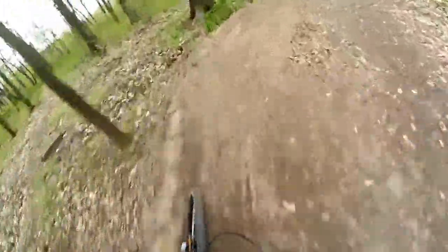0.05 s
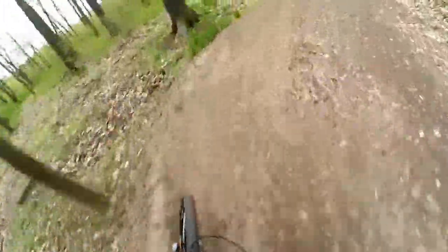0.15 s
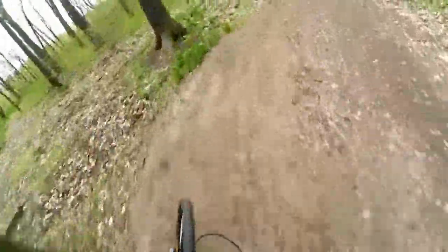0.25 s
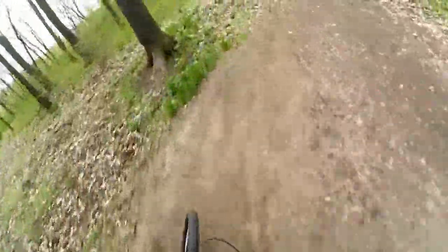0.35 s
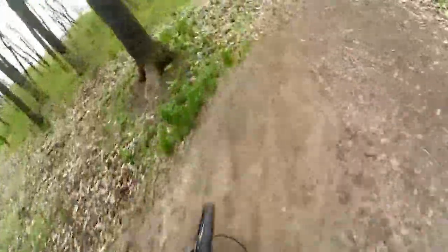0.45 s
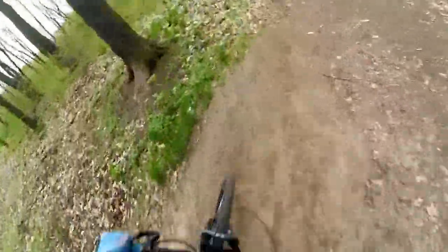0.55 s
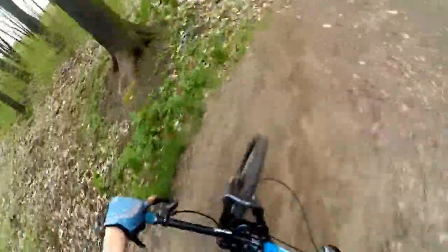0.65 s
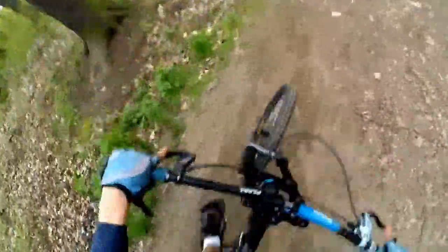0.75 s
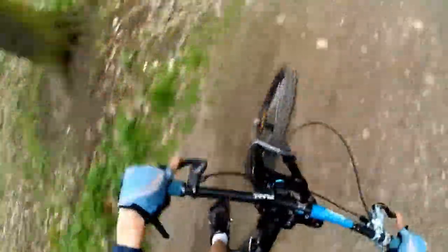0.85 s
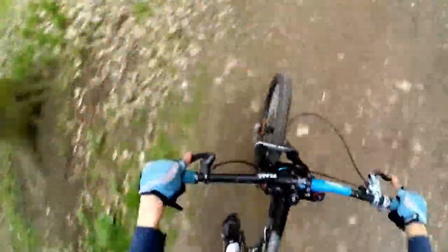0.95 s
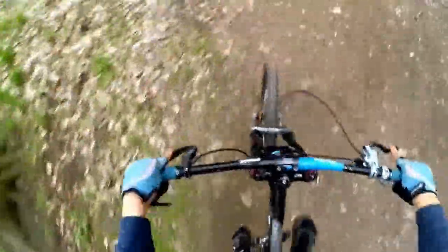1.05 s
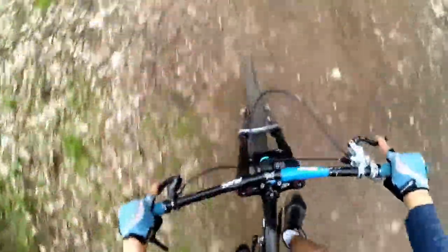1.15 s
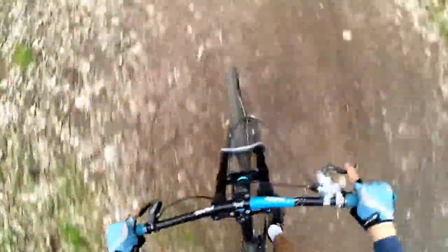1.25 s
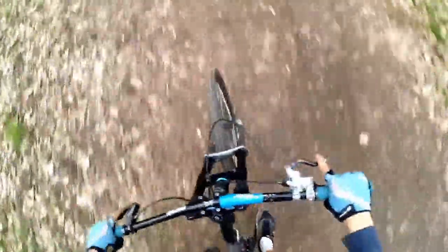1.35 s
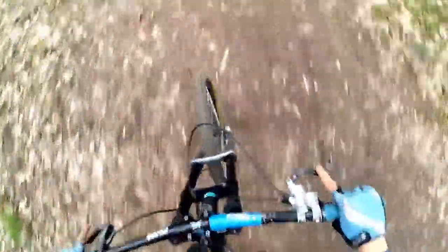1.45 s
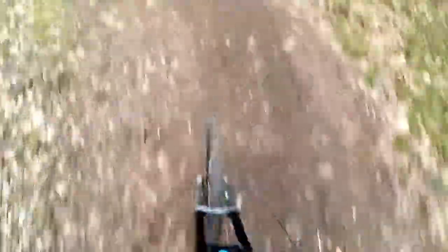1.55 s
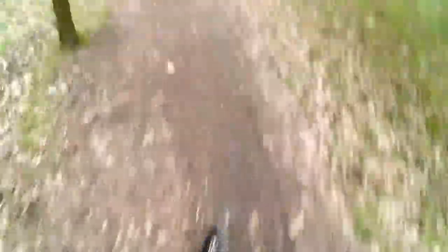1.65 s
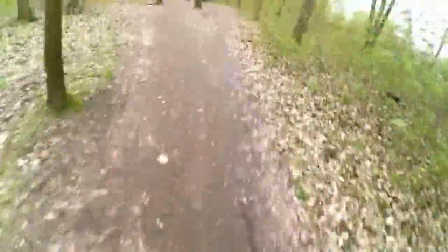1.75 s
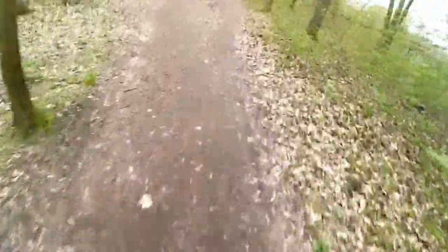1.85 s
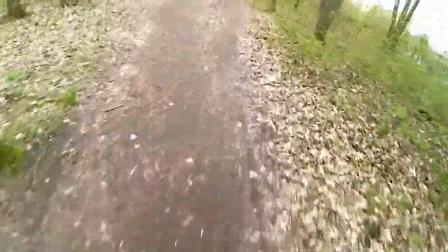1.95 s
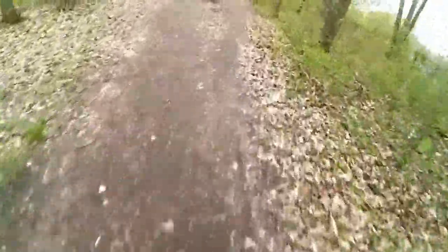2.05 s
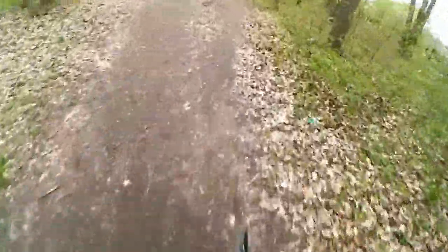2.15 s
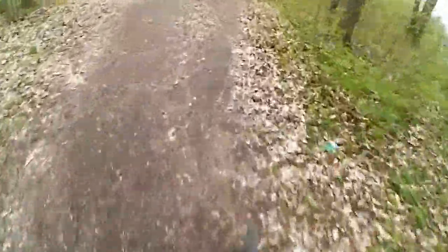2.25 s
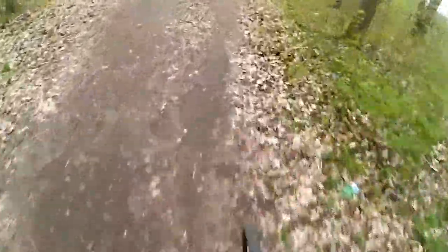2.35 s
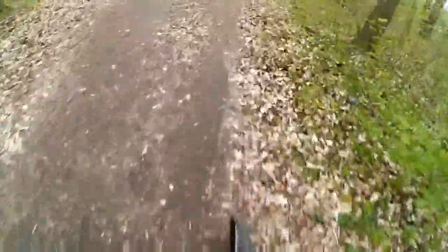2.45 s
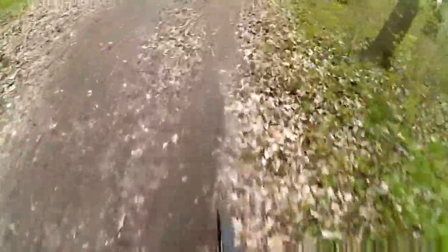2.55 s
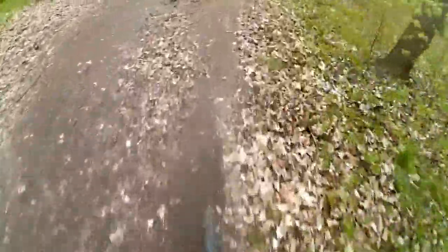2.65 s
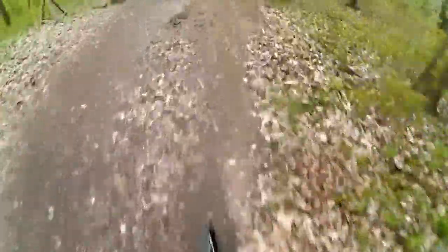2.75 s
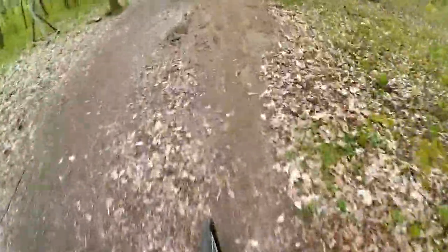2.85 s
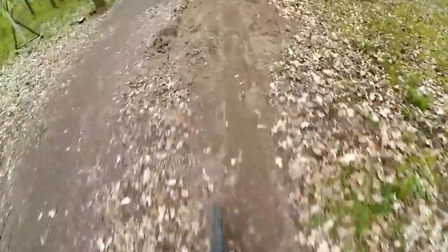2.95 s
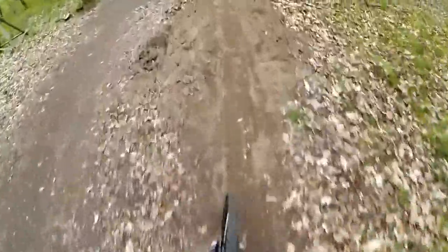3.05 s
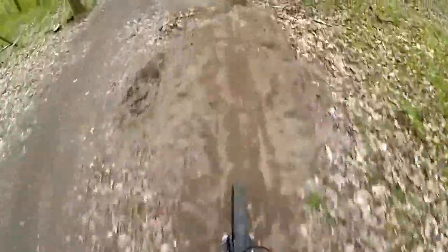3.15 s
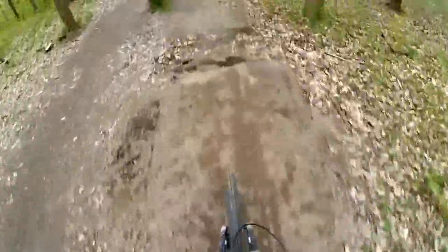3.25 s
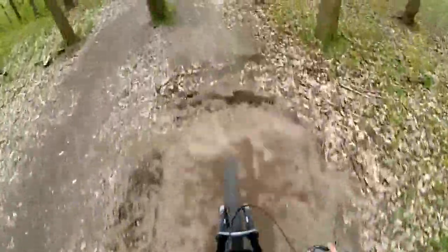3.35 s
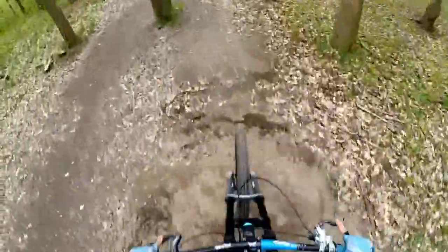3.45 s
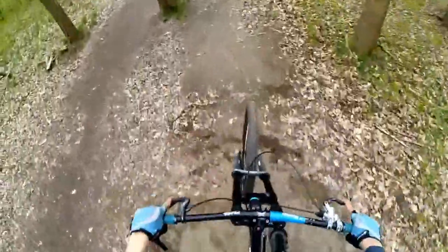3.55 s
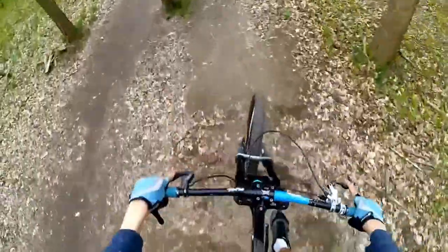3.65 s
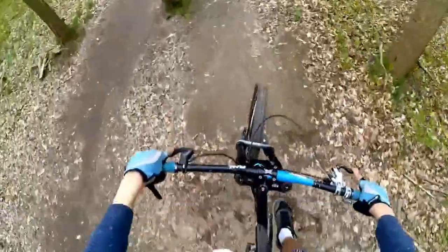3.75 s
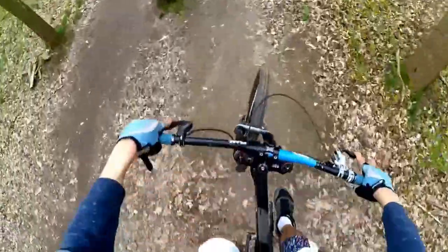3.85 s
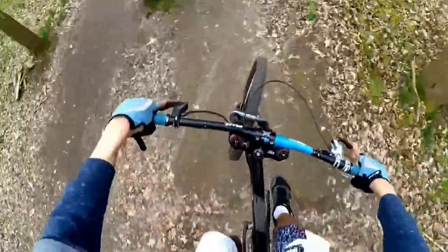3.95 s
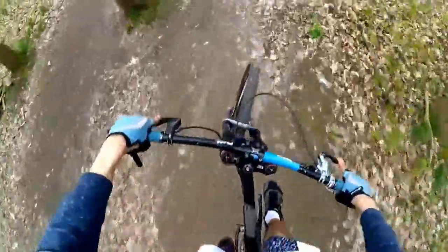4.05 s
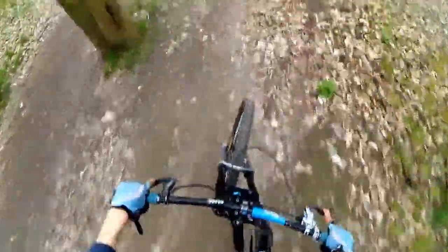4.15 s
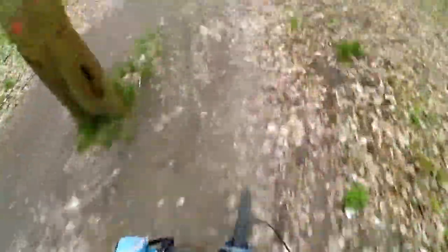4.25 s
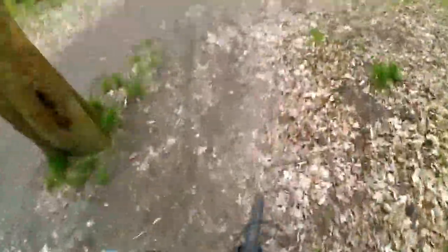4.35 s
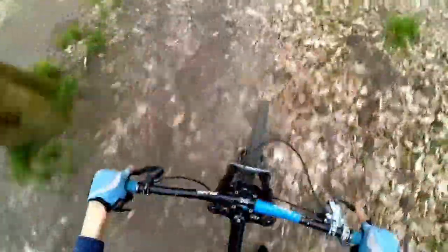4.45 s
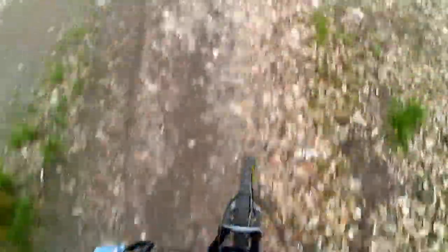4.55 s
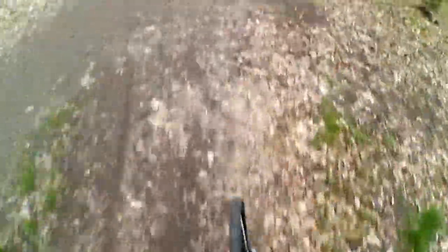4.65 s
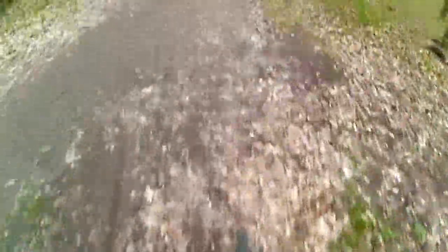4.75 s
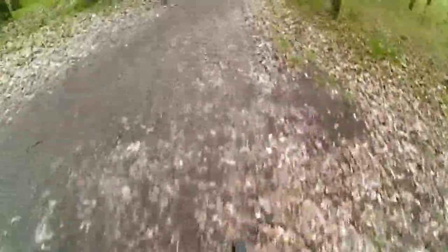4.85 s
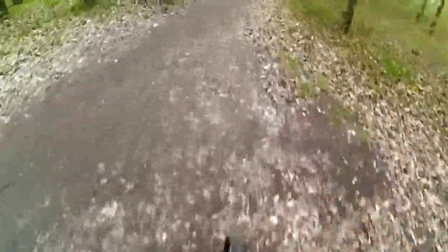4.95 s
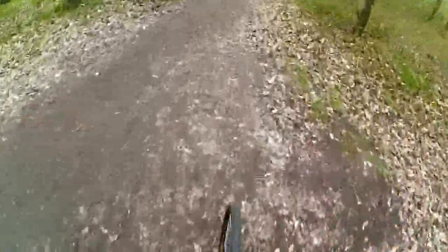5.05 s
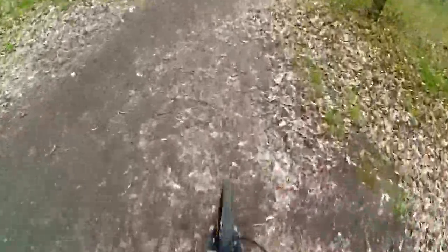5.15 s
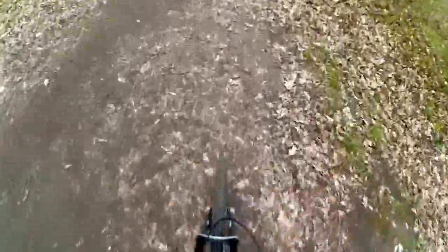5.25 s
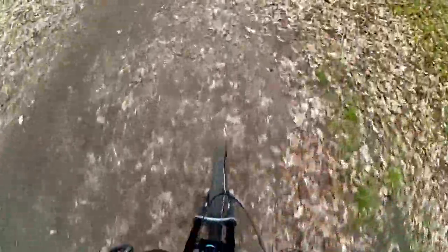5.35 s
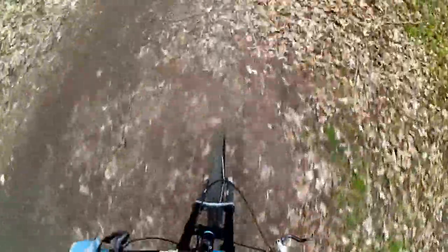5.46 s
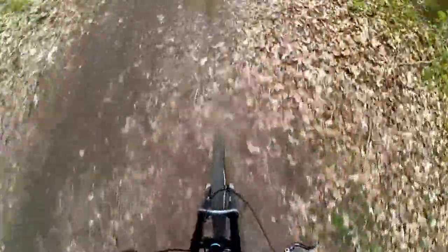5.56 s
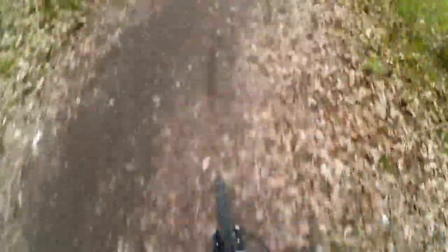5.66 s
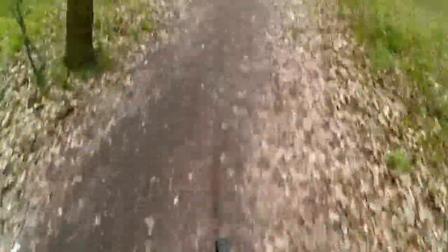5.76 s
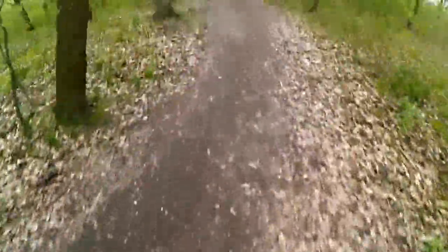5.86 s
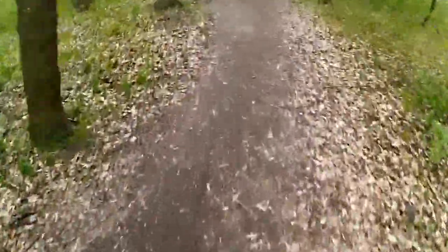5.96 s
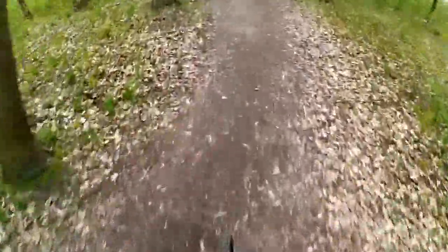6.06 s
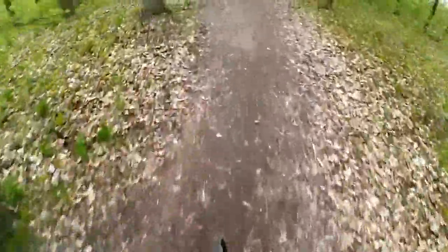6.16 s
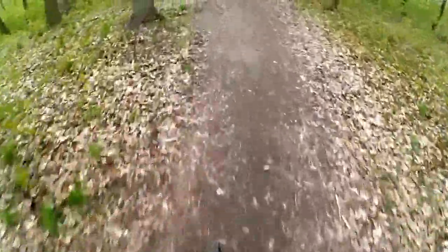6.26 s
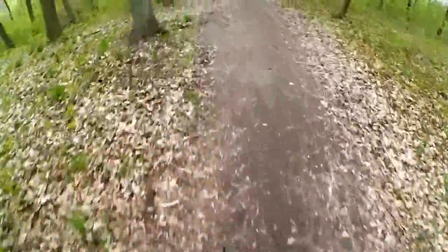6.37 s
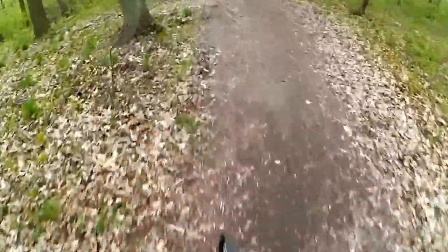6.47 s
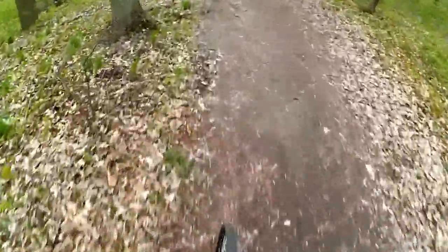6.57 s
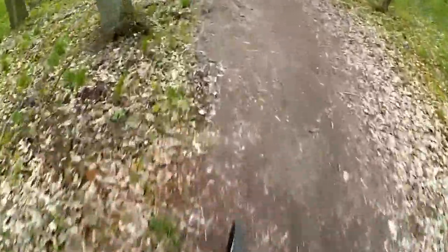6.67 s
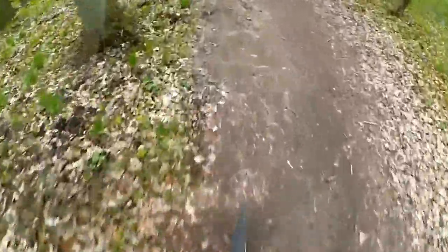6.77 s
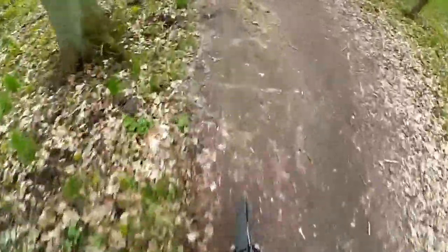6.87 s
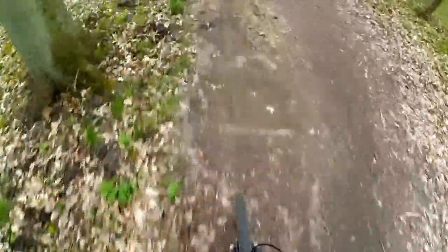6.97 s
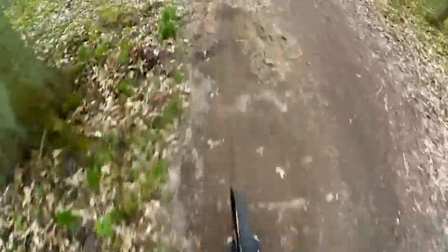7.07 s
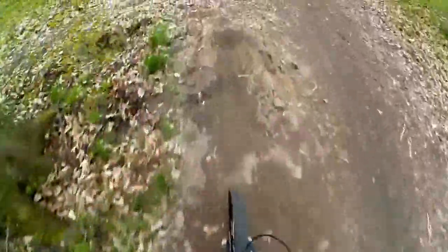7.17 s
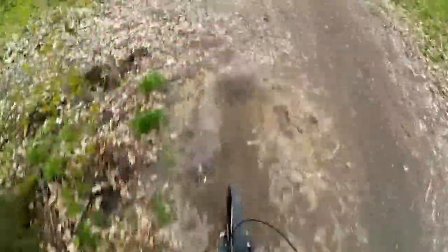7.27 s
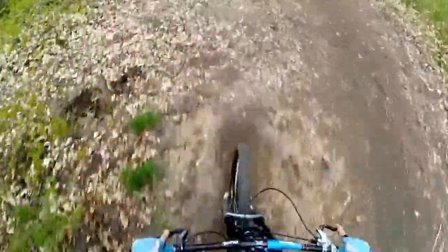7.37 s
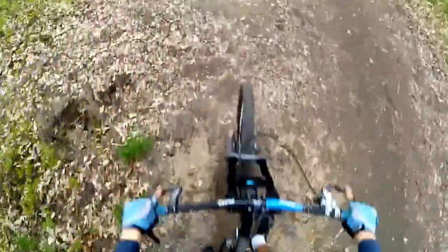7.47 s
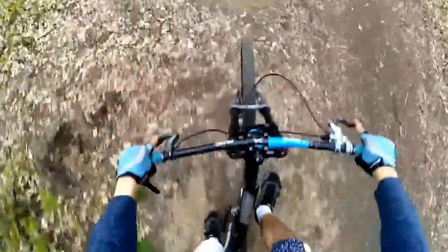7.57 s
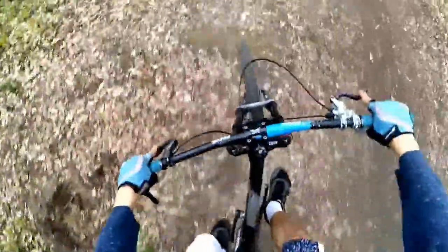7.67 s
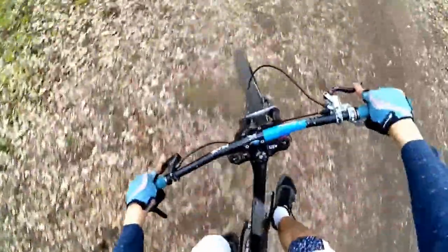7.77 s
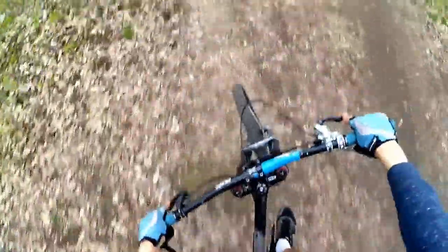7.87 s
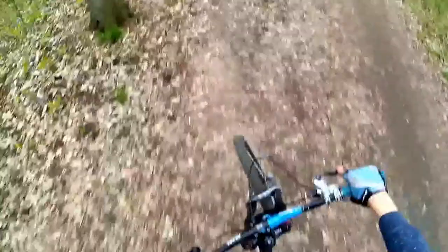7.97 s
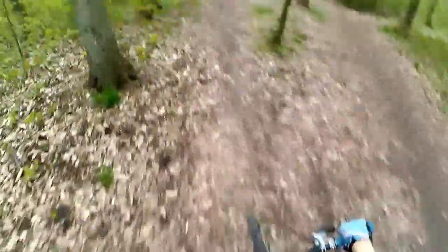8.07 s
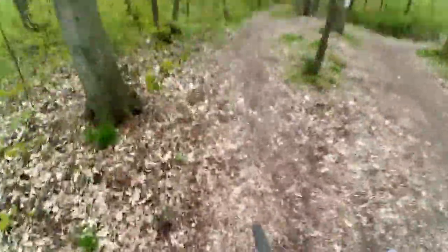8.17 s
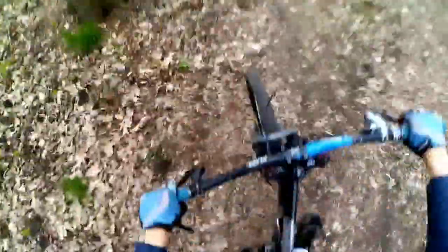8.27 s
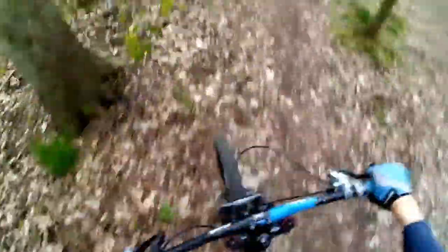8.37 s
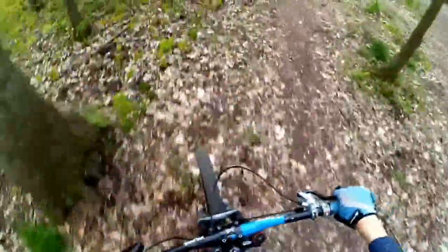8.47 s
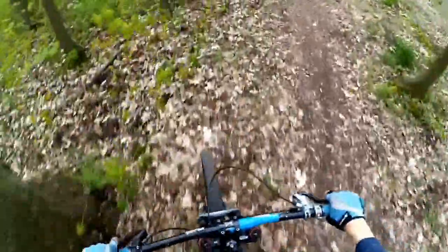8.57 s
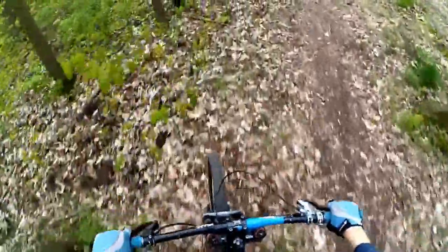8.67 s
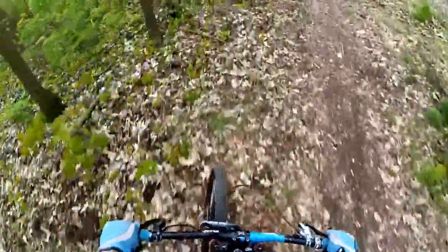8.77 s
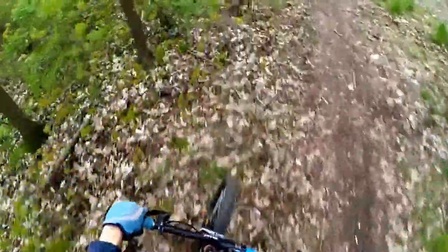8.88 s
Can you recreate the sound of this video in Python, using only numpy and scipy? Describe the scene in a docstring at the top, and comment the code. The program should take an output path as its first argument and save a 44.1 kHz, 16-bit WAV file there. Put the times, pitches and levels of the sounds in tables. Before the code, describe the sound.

A bike rolls fast down a woodland dirt path, heard close from the rider's chest. A dull tread hum, gritty rolling and leaf crackle continue beneath small metallic rattles. Early bumps bring low thuds and scraping; two brief airborne lulls each end in a heavy jolt, the second distorting the microphone. Faint hiss and low air lie underneath, mostly centred.

```python
"""Mountain-bike tyres hum and crunch down a dirt trail of dry leaves, falling quiet through two small jumps.
Place: the rider's chest, with a stereo camera microphone in a harness just above the bike.
Tread, dirt and leaves are shaped noise and grains; the knobs drone; cables and chain are struck resonances.
Jolts heave the camera with low swings and thuds, and its case scrapes in stick-slip grains.
The second landing overloads the microphone; a faint hiss and a little air lie underneath."""
import sys
import numpy as np
from scipy import signal
from scipy.fft import rfft, irfft, next_fast_len
from scipy.io import wavfile
from scipy.ndimage import uniform_filter1d, map_coordinates

SR = 44100
rng = np.random.default_rng(int(sys.argv[2]) if len(sys.argv) > 2 else 0)


def int16_out(signal):
    """Quantize to a 16-bit WAV file."""
    q = np.round(np.clip(np.atleast_2d(signal).T, -1, 1) * 32767)
    wavfile.write(sys.argv[1], SR, q.astype(np.int16))


N = 393372


def amp(db):
    """Amplitude of a level in dB."""
    return 10 ** (np.asarray(db) / 20)


def unit(x):
    """x at rms 1."""
    return x / np.sqrt(np.mean(x ** 2) + 1e-20)


def noise():
    """White noise as long as the scene."""
    return rng.standard_normal(N)


def curves(rows):
    """One value per sample for each column after the time."""
    times, *columns = np.transpose(rows)
    return [np.interp(np.arange(N) / SR, times, column) for column in columns]


def plateau(start, end, attack, release):
    """Rises to 1 over attack before start, holds until end, falls over release."""
    return np.interp(np.arange(N) / SR, [start - attack, start, end, end + release], [0, 1, 1, 0])


def wobble(rate, size=N):
    """A smooth random curve, rate knots a second."""
    knots = rng.standard_normal(int(size * rate / SR) + 4)
    return map_coordinates(knots, [np.arange(size) * rate / SR])


def filtered(x, response):
    """x times a complex response of frequency."""
    size = x.shape[-1]
    padded = next_fast_len(size + 4096)
    spectrum = rfft(x, padded) * response(np.fft.rfftfreq(padded, 1 / SR))
    return irfft(spectrum, padded)[..., :size]


def coloured(x, spectrum):
    """x shaped by (f/Hz, level/dB) points, with nothing above the last, at rms 1."""
    f, db = np.transpose(spectrum)
    return unit(filtered(x, lambda hz: amp(np.interp(np.log(hz + 1), np.log(f), db, right=-np.inf))))


def ring(x, modes):
    """x played through a body's resonances, alternating in sign."""
    def response(f):
        total = 0
        for k, (centre, width, db) in enumerate(modes):
            damping = 1j * f * width
            total = total + (-1) ** k * amp(db) * damping / (centre ** 2 - f ** 2 + damping)
        return total
    return filtered(x, response)


def struck(modes, spread_db):
    """The same resonances touched at a new spot: each is a little louder or softer."""
    return [(hz, width, db + spread_db * rng.standard_normal()) for hz, width, db in modes]


def three_bands(x, low_hz, high_hz):
    """The low, middle and high parts of x."""
    cuts = [(low_hz, "lowpass"), ([low_hz, high_hz], "bandpass"), (high_hz, "highpass")]
    filters = [signal.butter(3, hz, kind, fs=SR, output="sos") for hz, kind in cuts]
    return [signal.sosfiltfilt(sos, x, padlen=0) for sos in filters]


def grains(rate, spread_db, size=N):
    """Random tiny impacts of uneven strength, rate a second on average, at rms 1."""
    chance, strength = rng.random(size), rng.standard_normal(size)
    sign = rng.choice([-1, 1], size)
    return unit((chance < rate / SR) * sign * amp(spread_db * np.minimum(strength, 2.5)))


def add(track, s, sound):
    """Mix a sound into the track at time s."""
    start = max(round(s * SR), 0)
    track[start:start + len(sound)] += sound[:max(N - start, 0)]


# the faint hiss, a spectrum: f/Hz, level/dB per Hz (relative)
HISS_SPECTRUM = [(300, 1), (3000, -1.5), (9000, 1), (12000, 0), (14500, -1), (15500, -3)]


def hiss():
    """A steady, faint broadband hiss."""
    return amp(-76.5) * coloured(noise(), HISS_SPECTRUM)


# airflow over the microphone, a spectrum: f/Hz, level/dB per Hz (relative)
AIR_SPECTRUM = [(10, 0), (25, -8), (55, -23), (200, -29), (500, -44), (2000, -65)]


def air():
    """Air stirs left and right on their own: two unrelated low noises."""
    return amp(-59.0) * coloured(rng.standard_normal((2, N)), AIR_SPECTRUM)


# rough stretches of trail: start t/s, crest t/s, end t/s, rumble rise level/dB, sway rise level/dB
ROUGH_STRETCHES = [(0.49, 0.77, 1.27, 20, 12.5), (1.0, 1.4, 1.84, 4, 10), (1.65, 1.787, 2.1, 11.5, 8.5),
                   (2.15, 2.277, 2.58, 15, 10), (3.092, 3.406, 3.88, 21.5, 16), (4.161, 4.38, 4.87, 31, 22),
                   (5.144, 5.333, 5.5, 7.5, -0.5), (5.618, 5.935, 6.23, 13.5, 8),
                   (7.157, 7.457, 7.68, 26, 22), (8.06, 8.282, 8.73, 28.5, 21)]
ROUNDNESS = 0.56  # 0 = pointed crests, 1 = domed


def roughness():
    """How many dB the rough stretches, building to a crest and dying away, add to rumble and sway."""
    peaks = np.array([plateau(crest, crest, crest - start, end - crest)
                      for start, crest, end, _, _ in ROUGH_STRETCHES])
    domed = peaks * (1 + ROUNDNESS * (1 - peaks))
    return np.array(ROUGH_STRETCHES)[:, 3:].T @ domed


def rocking(spectrum, size):
    """Low noise with its own swells partly evened out over size samples."""
    x = coloured(noise(), spectrum)
    power = np.abs(signal.hilbert(x)) ** 2
    swell = np.sqrt(np.abs(uniform_filter1d(power, size=size)))
    return unit(x / (swell + 0.15))


# the swaying and the rumbling camera, two spectra: f/Hz, level/dB per Hz (relative)
SWAY_SPECTRUM = [(5, -4), (11, 0), (20, -3.5), (32, -10), (46, -20), (64, -35), (100, -60)]
RUMBLE_SPECTRUM = [(38, -9.5), (56, -3.5), (80, 0.5), (102, -9), (145, -20), (190, -22), (300, -37.5),
                   (600, -61)]
CALM_SWAY_DB, CALM_RUMBLE_DB = -37.5, -61  # the camera on smooth ground
# the second landing bottoms out and jars the camera: crest and half length in s, level of the added sway
OVERLOAD_S, OVERLOAD_HALF_S, OVERLOAD_DB = 8.405, 0.049, -7.5


def shaking():
    """The camera sways and rumbles on the chest as the trail roughens; the second landing jars it."""
    rumble_db, sway_db = roughness()
    t = np.arange(N) / SR
    jar = amp(OVERLOAD_DB) * np.exp(-((t - OVERLOAD_S) / OVERLOAD_HALF_S) ** 2)
    sway = amp(CALM_SWAY_DB + sway_db + 1.15 * wobble(5.4)) + jar
    rumble = amp(CALM_RUMBLE_DB + rumble_db + 3.2 * wobble(11)) + amp(-9) * jar
    return sway * rocking(SWAY_SPECTRUM, size=4000) + rumble * rocking(RUMBLE_SPECTRUM, size=1800)


# the hardest bumps heave the rider's chest:
# middle t/s, swing f/Hz, heave level/dB, half length t/s, thud level/dB
CHEST_HEAVES = [(0.755, 50.7, -18.5, 0.022, -44), (0.928, 28.4, -13.5, 0.031, -48.5),
                (1.784, 48, -26.5, 0.017, -51), (3.202, 65, -21, 0.014, -45.5),
                (3.348, 30, -15, 0.015, -49.5), (3.49, 54, -24, 0.018, -54), (4.36, 45.4, -5, 0.029, -36.5),
                (4.473, 50, -17, 0.016, -30.5), (4.523, 30, -11.5, 0.015, -35),
                (7.451, 50.4, -19, 0.015, -42), (7.581, 52.5, -23.5, 0.059, -52),
                (8.207, 43, -10, 0.037, -39.5), (8.315, 24.9, -24, 0.03, -27.5),
                (8.41, 31, 2.5, 0.017, -22)]
# the thud of a bump, a spectrum: f/Hz, level/dB per Hz (relative)
THUD_SPECTRUM = [(70, -8), (110, -5), (145, 7), (180, -2), (260, 1.5), (340, -11.5), (450, -9.5),
                 (650, -25), (1000, -48)]


def heaves():
    """Each hard bump swings the camera in a short low sine and thuds with a burst of dull noise."""
    swings, thud_level = np.zeros(N), np.zeros(N)
    t = np.arange(-SR // 8, SR // 8) / SR
    for s, hz, db, half_length, thud_db in CHEST_HEAVES:
        push = np.exp(-(t / half_length) ** 2)
        add(swings, s + t[0], amp(db) * push * np.sin(2 * np.pi * hz * t))
        add(thud_level, s + t[0], amp(thud_db) * push)
    return swings + thud_level * coloured(noise(), THUD_SPECTRUM)


# the case scrapes in its harness, right at the microphone:
# start t/s, swell t/s, fade t/s, body level/dB (rms over the stroke), rasp level/dB re body
CASE_SCRAPES = [(0.713, 0.0082, 0.04, -36.5, -6), (0.814, 0.055, 0.027, -45, -9),
                (0.972, 0.025, 0.014, -51.5, -7.5), (1.498, 0.019, 0.067, -52.5, -5),
                (1.692, 0.071, 0.031, -41.5, -6), (3.183, 0.032, 0.029, -43.5, -9.5),
                (3.324, 0.013, 0.035, -40.5, -7.5), (3.476, 0.01, 0.03, -38.5, -6.5),
                (4.293, 0.034, 0.023, -33.5, -1), (4.348, 0.017, 0.027, -35.5, 3),
                (4.38, 0.021, 0.024, -40.5, -8), (4.424, 0.022, 0.049, -34, -2.5),
                (4.495, 0.013, 0.025, -32.5, -4), (4.55, 0.041, 0.035, -34, -4.5),
                (4.682, 0.015, 0.021, -55, -6), (5.891, 0.016, 0.024, -40.5, -9.5),
                (7.386, 0.017, 0.07, -51, -6), (7.5, 0.02, 0.04, -37.5, -2.5),
                (8.176, 0.013, 0.013, -30.5, -4.5), (8.197, 0.017, 0.042, -41.5, -2.5),
                (8.258, 0.023, 0.061, -35, -5.5), (8.307, 0.02, 0.026, -17.5, -0.5),
                (8.372, 0.033, 0.026, -34.5, 5.5), (8.418, 0.027, 0.016, -42.5, -9)]
# resonances of the camera case: f/Hz, width f/Hz, level/dB
CASE_MODES = [(252, 56, -20), (714, 86, -7.5), (794, 89, -8.5), (1005, 106, 1), (1123, 129, 1),
              (1266, 160, 0), (1435, 180, -8.5), (1840, 61, -8.5), (1986, 446, -4), (2470, 408, -0.5),
              (2866, 273, -3), (3194, 112, -6), (3900, 430, -12.5), (4820, 490, -14), (6220, 900, -19),
              (8800, 2600, -27.5), (13100, 4000, -35.5)]
# fizz re rasp in a medium stroke; dB of fizz lost per dB a stroke is louder; body of a medium stroke
FIZZ_DB, FIZZ_DULLS, MEDIUM_SCRAPE_DB = -10.5, 0.31, -36


def scrapes():
    """The case sticks and slips against the harness: each stroke swells to a crest and stops short."""
    track = np.zeros(N)
    for start, swell, fade, db, rasp_db in CASE_SCRAPES:
        crest, end = start + swell, start + swell + fade
        fizz_db = rasp_db + FIZZ_DB - FIZZ_DULLS * (db - MEDIUM_SCRAPE_DB)
        t = start + np.arange(SR // 6) / SR
        knots = [start, start + 0.0016, crest, (crest + end) / 2, end]
        pressure = np.interp(t, knots, [0.095, 0.12, 0.86, 0.59, 0])
        slips = pressure * grains(rate=2100, spread_db=2.5, size=len(t))
        slips = slips * amp(1.5 * wobble(152, size=len(t)))
        body, rasp, fizz = three_bands(ring(slips, CASE_MODES), 1500, 3990)
        stroke = unit(body) + amp(rasp_db) * unit(rasp) + amp(fizz_db) * unit(fizz)
        # a longer stroke carries more energy at the same level
        add(track, start, amp(db) * stroke * np.sqrt(abs(end - start) / (t[-1] - t[0])))
    return track


# the two jumps: take-off t/s, touch-down t/s, fall of the hum level/dB,
# fall of the leaves level/dB (dirt falls half as far)
TRAIL_JUMPS = [(3.637, 4.204, 4.5, 12), (7.648, 8.1, 3.5, 8)]
UNLOAD_S, RELOAD_S = 0.19, 0.05  # fading out from take-off, and coming back just before touch-down


def aloft():
    """For each jump: 1 in the air, 0 on the ground, with ramps at both ends."""
    return np.array([plateau(off + UNLOAD_S, down - RELOAD_S, UNLOAD_S, RELOAD_S)
                     for off, down, _, _ in TRAIL_JUMPS])


def faint(db, colour_db, count):
    """Up to count small contacts at chance moments out of the jumps: (t/s, peak level/dB, colour level/dB)."""
    spread_db = 2.5
    rows = [(u * N / SR, db + spread_db * (2 * v - 1), colour_db + spread_db * (2 * w - 1))
            for u, v, w in rng.random((count, 3))]
    return [row for row in rows if not any(off < row[0] < down for off, down, _, _ in TRAIL_JUMPS)]


def contacts(rows, modes, low_hz, high_hz, attack, t60, tail_db, tail_t60):
    """Each contact is a brief chatter and a weaker after-rattle; band levels set the balance of the modes."""
    track, t = np.zeros(N), np.arange(SR // 6) / SR
    for s, db, low_db, high_db in rows:
        decay = amp(-60 * t / t60) + amp(tail_db - 60 * t / tail_t60)
        force = (1 - np.exp(-t / attack)) * decay
        answer = ring(force * rng.standard_normal(len(t)), struck(modes, spread_db=3.5))
        low, middle, high = three_bands(answer, low_hz, high_hz)
        hit = amp(low_db) * unit(low) + unit(middle) + amp(high_db) * unit(high)
        peak = np.sqrt(uniform_filter1d(hit ** 2, size=128).max())
        add(track, s, amp(db) * hit / peak)
    return track


RATTLE_DB = -6.5  # lowers all ticks and slaps below their listed peaks
# the chain slaps and jingles: t/s, peak level/dB before RATTLE_DB, jingle level/dB re its middle
CHAIN_SLAPS = [(0.2576, -47, 12), (0.4038, -46.5, 1), (0.915, -43, -3), (1.105, -35.5, -15),
               (1.115, -34, -7.5), (2.505, -29, -6), (2.5237, -25.5, -15), (3.5632, -27.5, -12.5),
               (3.6532, -43.5, -7), (4.2213, -32.5, 1), (4.2825, -32.5, -4), (4.7803, -47, 2),
               (5.1023, -40.5, -11), (5.47, -44, -4), (5.6467, -29, -9.5), (5.657, -43, 2),
               (5.7195, -30.5, -4.5), (5.74, -40, -8), (5.775, -28.5, -10), (5.7868, -38, -7),
               (5.839, -45.5, -12), (7.3393, -38.5, 4), (7.4496, -42, -3), (7.694, -36.5, -13),
               (7.7303, -47, 4), (8.078, -41.5, -25), (8.092, -38.5, -6), (8.1328, -36, -5),
               (8.14, -34, -4), (8.7638, -44, -6)]
# resonances of chain and stay: f/Hz, width f/Hz, level/dB
STAY_MODES = [(1160, 1100, -2.5), (2280, 390, 3.5), (2930, 78, 2.5), (3540, 260, 1.5), (4050, 240, 2),
              (4900, 390, -7.5), (6410, 610, -4.5), (7630, 400, -8), (7940, 390, -10), (11900, 3000, -25),
              (14300, 1800, -31)]


def slaps():
    """The chain slaps the stay: bright, longer-ringing contacts, with fainter ones scattered between."""
    events = [*CHAIN_SLAPS, *faint(-47, colour_db=-11, count=12)]
    rows = [(s, db, -10.5, jingle_db) for s, db, jingle_db in events]  # bass 10.5 dB under the middle
    return amp(RATTLE_DB) * contacts(rows, STAY_MODES, 2580, 6200,
                                     attack=0.00051, t60=0.043, tail_db=-18.0, tail_t60=0.3)


# cables and levers tick on the frame: t/s, peak level/dB before RATTLE_DB, knock level/dB re its middle
FRAME_TICKS = [(0.159, -36.5, -7), (0.257, -41.5, -1), (0.5062, -39, 0), (0.626, -36.5, -1),
               (0.7675, -34, -18), (2.0157, -35, -10), (2.0722, -41, -22), (2.151, -34.5, -4),
               (2.2143, -36, -5), (2.25, -38, -2), (2.2804, -38, 5), (2.329, -34.5, -10),
               (2.7332, -38.5, -11), (2.8932, -33, -15), (2.9792, -37.5, -3), (3.0939, -38, -4),
               (3.1961, -32.5, 4), (4.1, -51, -3), (4.1591, -52, -2), (4.1938, -43.5, -4), (4.4852, -22, 1),
               (5.0527, -39, -6), (5.237, -40, 1), (5.8693, -41.5, -5), (6.0605, -39, -16),
               (6.281, -45, -16), (6.833, -42, -19), (7.2523, -38.5, -2), (7.2723, -28, -2),
               (7.6321, -41, -6), (7.976, -41.5, -2)]
# resonances of the frame: f/Hz, width f/Hz, level/dB
FRAME_MODES = [(300, 180, -12.5), (710, 93, -8), (1038, 46, -2.5), (1330, 135, -1.5), (1885, 75, -1),
               (2295, 165, 3), (2870, 170, 1.5), (3165, 155, -1.5), (3520, 550, -6), (4330, 980, -8.5),
               (6940, 2000, -23), (10500, 4600, -32)]


def ticks():
    """Cables and levers tick on the frame: dull, short contacts, with fainter ones scattered between."""
    events = [*FRAME_TICKS, *faint(-45, colour_db=-13, count=20)]
    rows = [(s, db, knock_db, -15.5) for s, db, knock_db in events]  # treble 15.5 dB under the middle
    return amp(RATTLE_DB) * contacts(rows, FRAME_MODES, 1360, 3900,
                                     attack=0.00056, t60=0.02, tail_db=-21, tail_t60=0.1)


# the knobs bite and drone louder: crest t/s, half length t/s, pitch f/Hz, level/dB
KNOB_BITES = [(1.259, 0.0797, 214, -55.5), (1.37, 0.05, 289.7, -58), (1.541, 0.062, 216, -53.5),
              (1.628, 0.05, 262, -54), (6.804, 0.24, 208, -62.5), (7.731, 0.059, 216, -57.5)]
KNOB_HZ, KNOB_DB = 207, -68  # the drone in plain rolling


def drone():
    """Knobs strike the packed dirt in quick, unsteady succession; each bite swells and pulls the pitch."""
    t = np.arange(N) / SR
    plain = amp(KNOB_DB - 6.9 * aloft().sum(0))
    bites = [amp(db) * np.exp(-((t - s) / half) ** 2) for s, half, _, db in KNOB_BITES]
    swells = [plain] + bites
    pitches = [KNOB_HZ] + [pitch for _, _, pitch, _ in KNOB_BITES]
    hz = np.dot(pitches, swells) / sum(swells)  # the louder swell has more say
    unsteady = 1 + 0.065 * wobble(55)
    phase = 2 * np.pi * np.cumsum(hz * unsteady) / SR
    return np.linalg.norm(swells, axis=0) * amp(1.8 * wobble(30)) * unit(np.sin(phase))


# rolling before, between and after the jumps:
# t/s, tread hum level/dB, leaf crunch level/dB, all before the trims below
RUN_IN_LEVELS = [(0.0, -62.5, -70), (0.5, -62, -70), (0.83, -56, -65), (1.02, -61.5, -62.5),
                 (1.6, -57, -66), (1.92, -61, -66.5), (3.4, -58, -65), (3.6, -61, -70.5)]
RUN_BETWEEN_LEVELS = [(4.68, -63.5, -63.5), (5.45, -62.5, -67.5), (5.73, -61, -62), (6.09, -59.5, -69),
                      (6.65, -59, -69), (7.17, -61.5, -67.5), (7.43, -56.5, -61), (7.66, -56.5, -68)]
RUN_OUT_LEVELS = [(8.52, -67, -58), (8.666, -72, -60.5), (8.88, -64, -57)]
# landings press the tyres into the ground: start t/s, end t/s, press level/dB (scaled for each layer)
LANDING_PRESSES = [(4.295, 4.566, 11), (8.172, 8.421, 12.5)]
PRESS_S, RELAX_S = 0.067, 0.046  # the suspension sinks, and comes back
HUM_DB, ROLL_DB, CRUNCH_DB = 2, -3, 0.8  # trims of the three layers
ROLL_GROWS = 0.15  # dB of dirt per dB of rumble


def tyre_levels():
    """Hum, dirt and leaves in dB: they fall in the air and swell on landing; rough ground throws more dirt."""
    tread_db, leaf_db = curves([*RUN_IN_LEVELS, *RUN_BETWEEN_LEVELS, *RUN_OUT_LEVELS])
    hum_fall_db, ground_fall_db = np.array(TRAIL_JUMPS)[:, 2:].T @ aloft()
    press_db = sum(db * plateau(start, end, PRESS_S, RELAX_S) for start, end, db in LANDING_PRESSES)
    hum_db = HUM_DB + tread_db - hum_fall_db + 1.1 * press_db
    roll_db = ROLL_DB + (tread_db + leaf_db) / 2 - 0.5 * ground_fall_db + 0.5 * press_db
    roll_db = roll_db + ROLL_GROWS * roughness()[0]
    crunch_db = CRUNCH_DB + leaf_db - ground_fall_db + 0.66 * press_db
    return hum_db, roll_db, crunch_db


# resonances of the chain links: f/Hz, width f/Hz, level/dB
LINK_MODES = [(6900, 220, -7), (8250, 130, 0), (9200, 260, -8), (10600, 350, -11)]


def debris(crunch_db):
    """Flung grit rings the frame and chain links clink faintly, both following the leaf crunch."""
    grit = amp(crunch_db - 4.5) * unit(ring(grains(rate=44, spread_db=6.0), FRAME_MODES))
    links = amp(crunch_db - 13) * unit(ring(grains(rate=18, spread_db=7.0), LINK_MODES))
    return grit + links


# tread hum, rolling dirt and breaking leaves, three spectra: f/Hz, level/dB per Hz (relative)
TREAD_SPECTRUM = [(70, -23.5), (100, 10), (140, -3.5), (200, 0), (270, -4), (345, -2.5), (440, -13),
                  (600, -19), (900, -19), (2000, -52)]
DIRT_SPECTRUM = [(400, -22.5), (650, -8.5), (800, -19), (980, -0.5), (1130, -1), (1350, -8.5),
                 (1600, -16.5), (1900, -7), (2100, -14.5), (2400, -2.5), (2800, -12), (4000, -35)]
LEAF_SPECTRUM = [(900, -15.5), (1600, -20), (1950, -8.5), (2150, -14.5), (2450, -5.5), (3050, -4),
                 (3500, 3.5), (3950, 3.5), (4450, -10), (4900, -4.5), (5350, -10), (6400, -3.5),
                 (7600, -12), (10000, -18.5), (15800, -19.5)]
CRACKLE_PER_S, CRACKLE_DB = 100, -7.5  # single dry leaves snap; level re the crunch


def tyres():
    """The casings hum, dirt rolls under them and dry leaves break in clumps or snap singly."""
    hum_db, roll_db, crunch_db = tyre_levels()
    hum = amp(hum_db + 1.36 * wobble(15)) * coloured(noise(), TREAD_SPECTRUM)
    roll = amp(roll_db + 0.93 * wobble(25)) * coloured(noise(), DIRT_SPECTRUM)
    breaking = grains(rate=2000, spread_db=2) * amp(1.7 * wobble(54)) + 0.5 * noise()
    crunch = amp(crunch_db) * coloured(breaking, LEAF_SPECTRUM)
    snaps = grains(rate=CRACKLE_PER_S, spread_db=1.5)
    crackle = amp(crunch_db + CRACKLE_DB) * coloured(snaps, LEAF_SPECTRUM)
    return hum + roll + crunch + crackle + debris(crunch_db)


# a slight stereo width, widest in the deepest bass and top treble: f/Hz, side level/dB re middle
STEREO_WIDTH = [(25, -23.5), (125, -55), (250, -54), (600, -71), (1200, -71.5), (2800, -65), (5500, -53),
                (12000, -36)]


def scene():
    """The ride and hiss sit in the middle with a slight stereo width; the air differs from left to right."""
    middle = hiss() + shaking() + heaves() + scrapes() + slaps() + ticks() + drone() + tyres()
    f, db = np.transpose(STEREO_WIDTH)
    # a quarter-turn in phase, added on one channel and taken away on the other
    side = filtered(middle, lambda hz: 1j * amp(np.interp(np.log(hz + 1), np.log(f), db)))
    return np.array([middle + side, middle - side]) + air()


TOP_HZ = 15400  # the camera's band limit


def record(dry):
    """The camera saturates towards full scale, then cuts steeply above its band limit."""
    clipped = dry / (1 + np.abs(dry) ** 8) ** (1 / 8)
    return filtered(clipped, lambda hz: 1 / np.sqrt(1 + (hz / TOP_HZ) ** 160))


dry = scene()
out = record(dry)
int16_out(out)
```